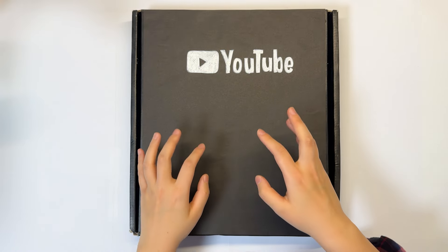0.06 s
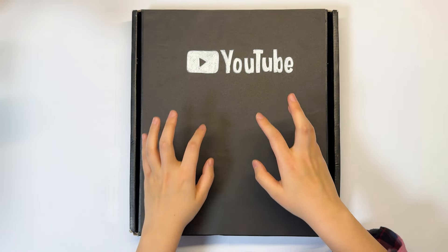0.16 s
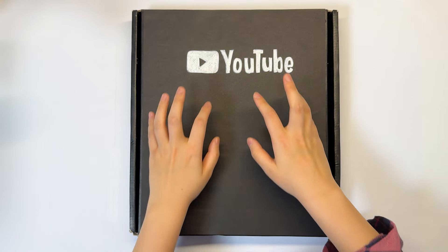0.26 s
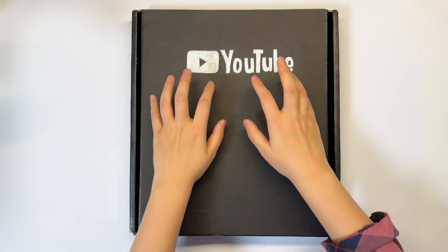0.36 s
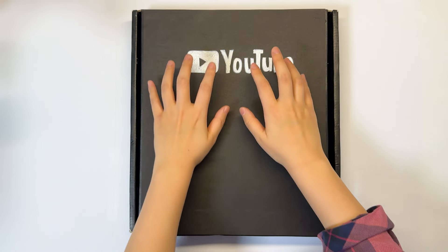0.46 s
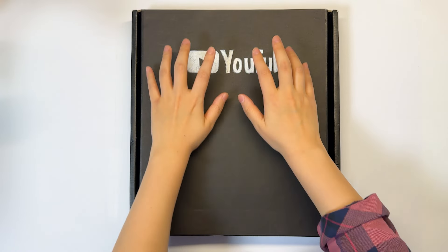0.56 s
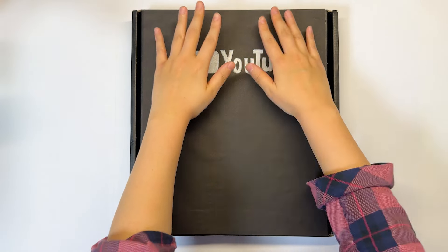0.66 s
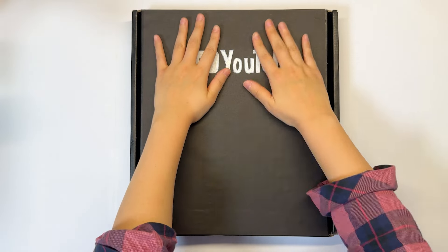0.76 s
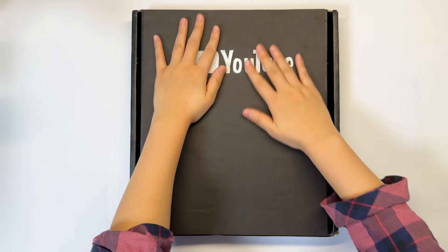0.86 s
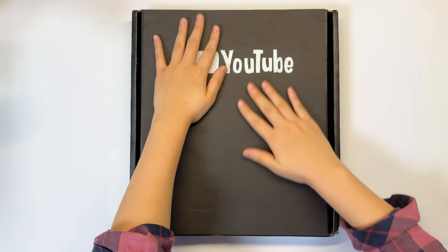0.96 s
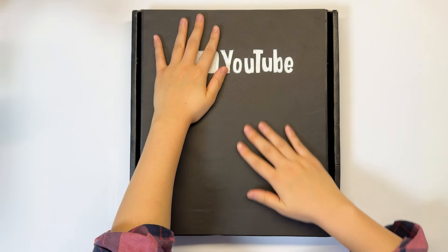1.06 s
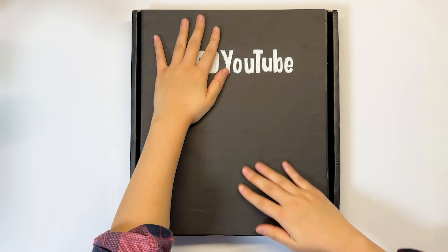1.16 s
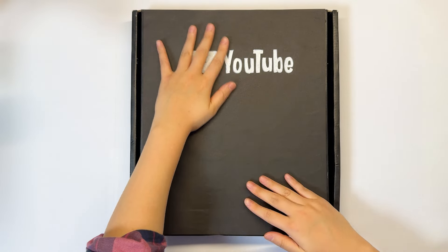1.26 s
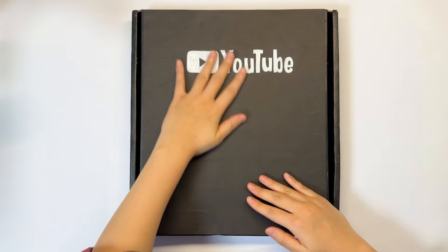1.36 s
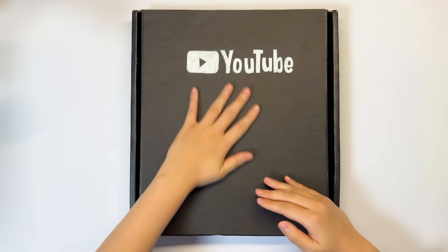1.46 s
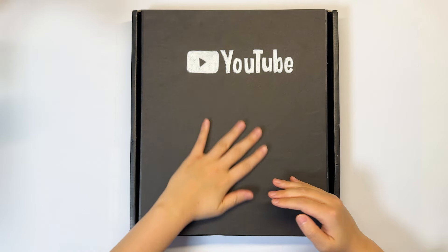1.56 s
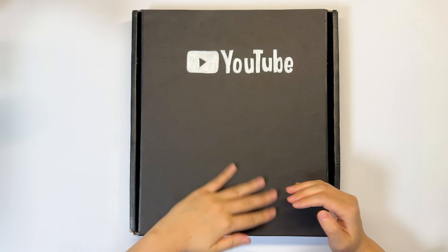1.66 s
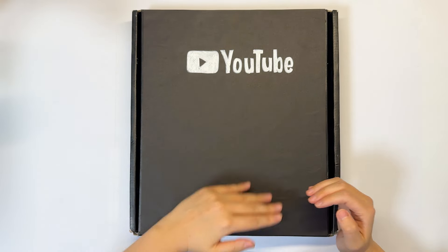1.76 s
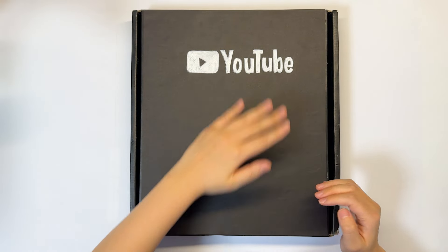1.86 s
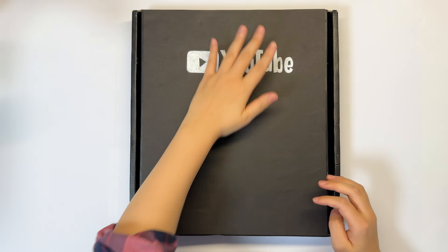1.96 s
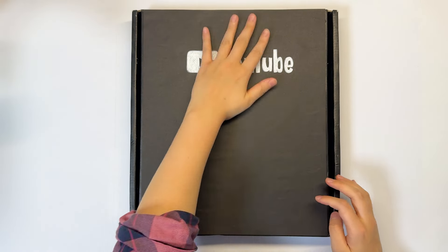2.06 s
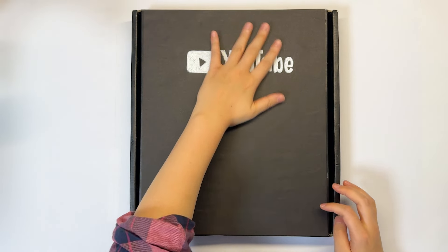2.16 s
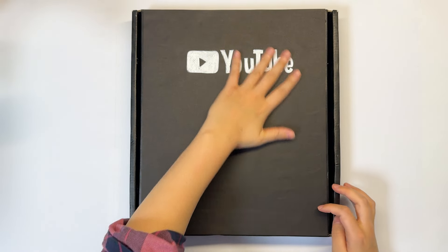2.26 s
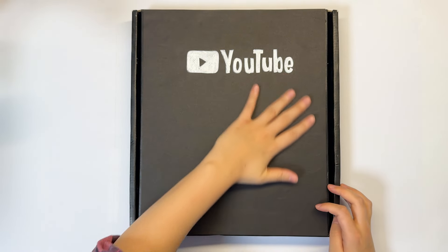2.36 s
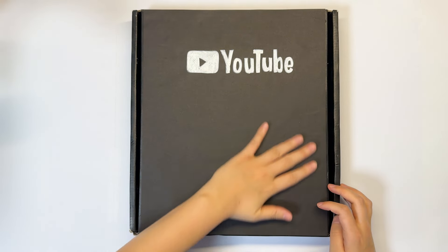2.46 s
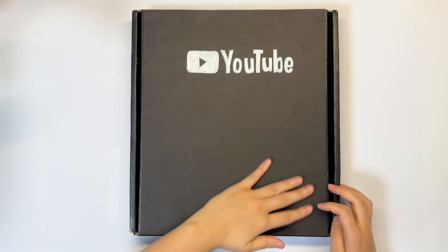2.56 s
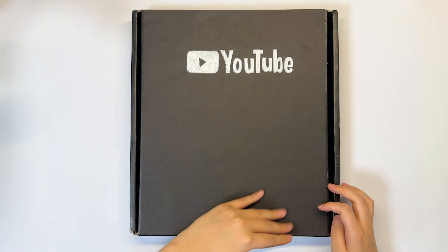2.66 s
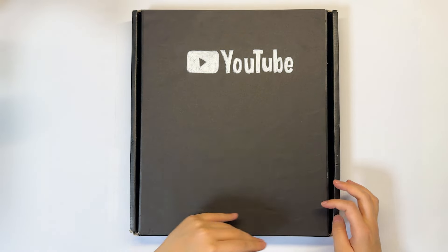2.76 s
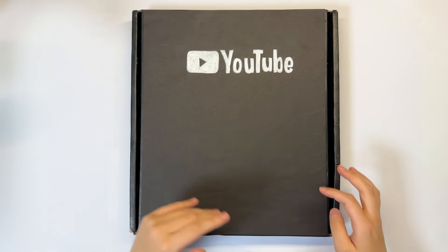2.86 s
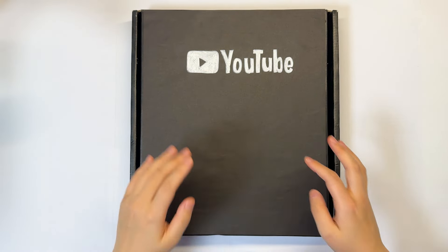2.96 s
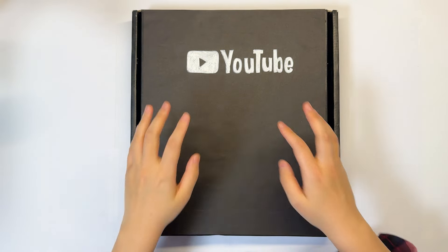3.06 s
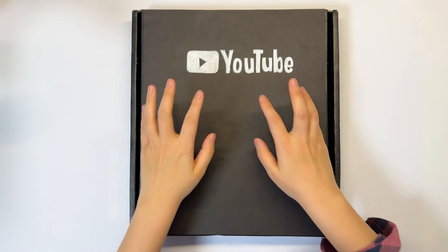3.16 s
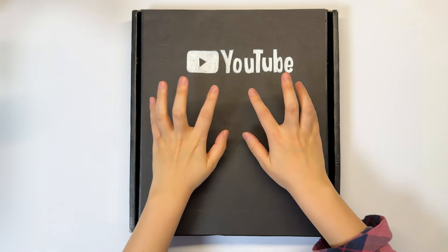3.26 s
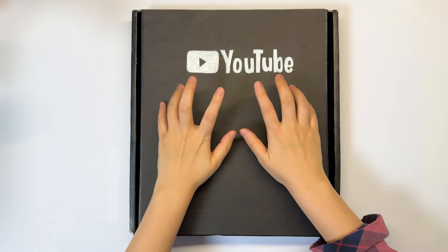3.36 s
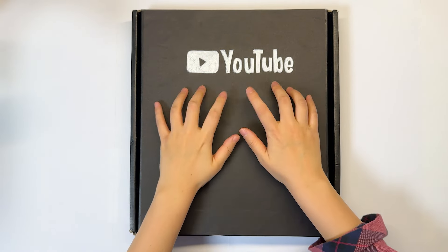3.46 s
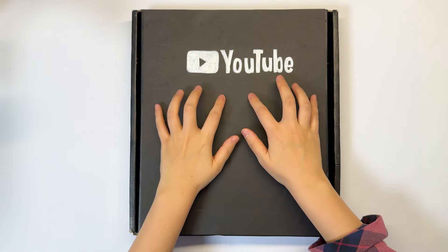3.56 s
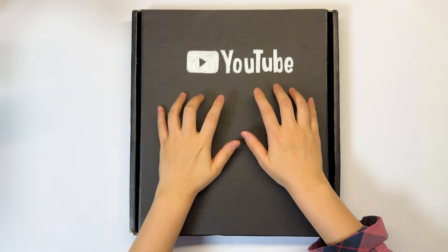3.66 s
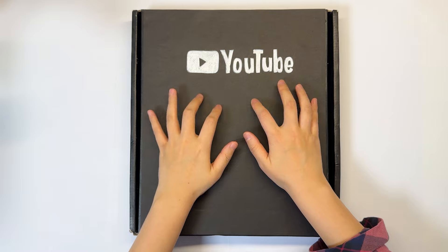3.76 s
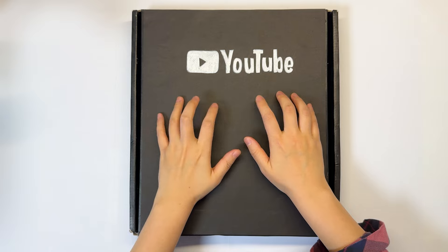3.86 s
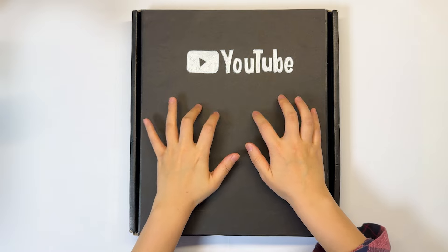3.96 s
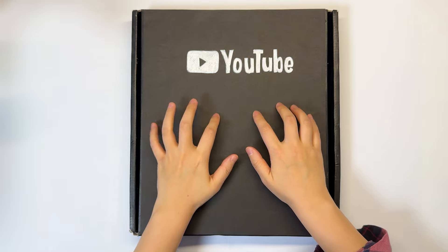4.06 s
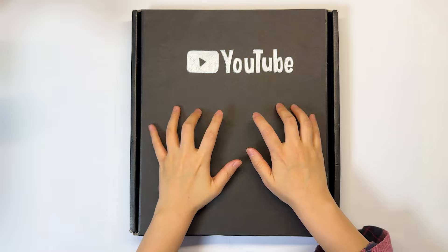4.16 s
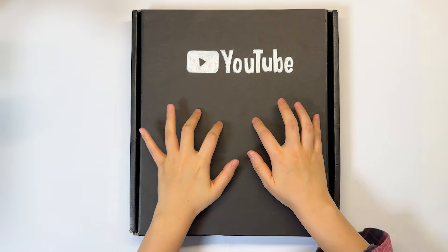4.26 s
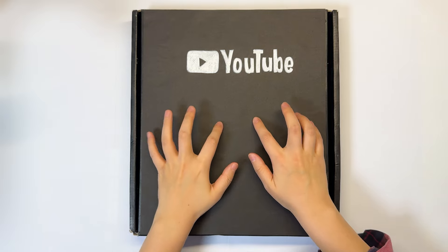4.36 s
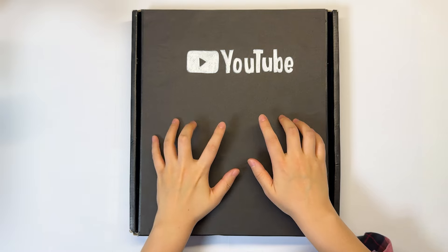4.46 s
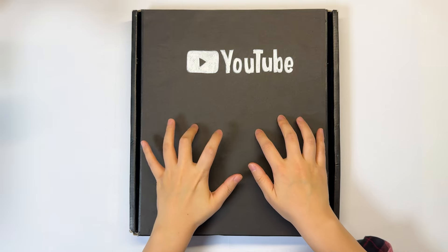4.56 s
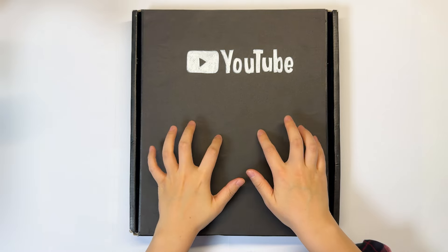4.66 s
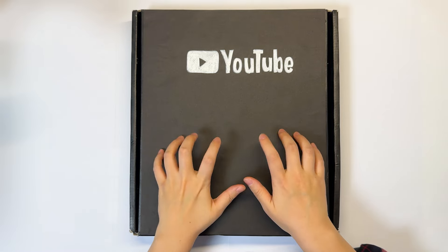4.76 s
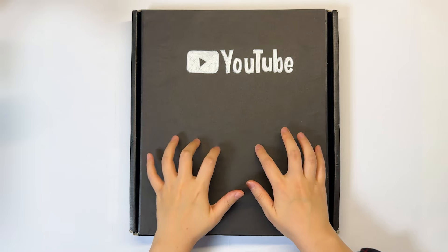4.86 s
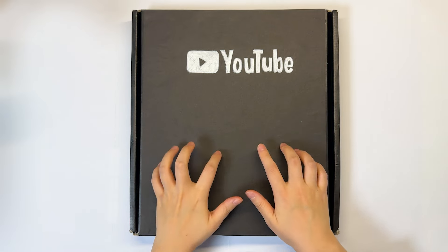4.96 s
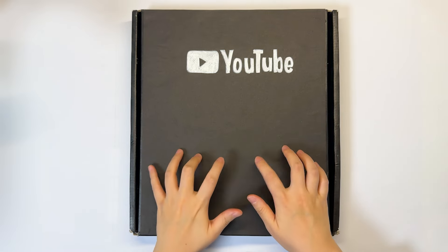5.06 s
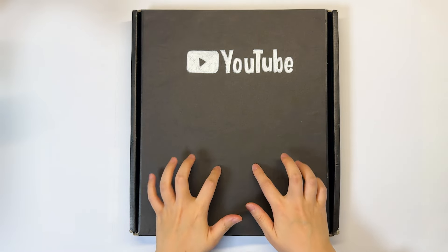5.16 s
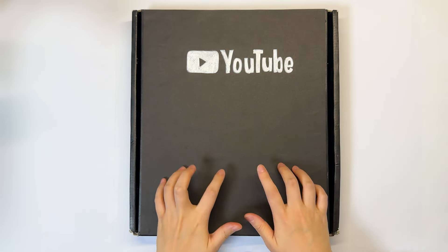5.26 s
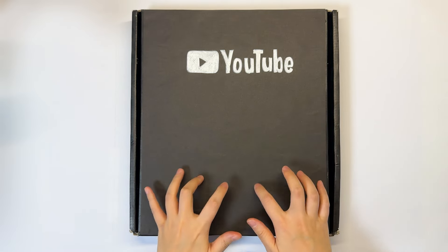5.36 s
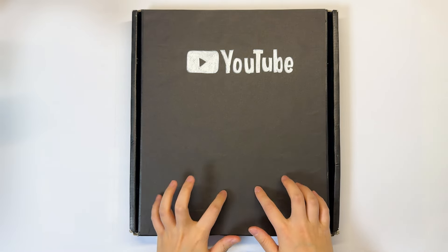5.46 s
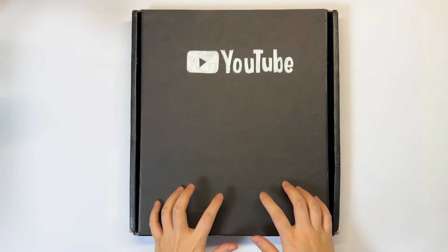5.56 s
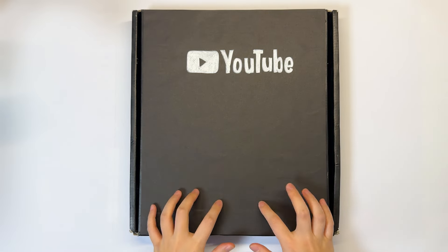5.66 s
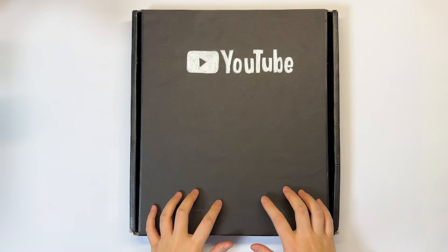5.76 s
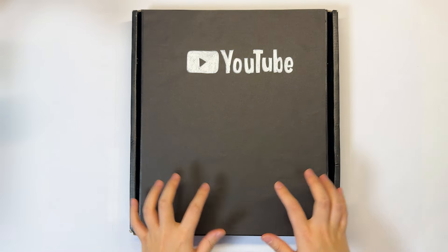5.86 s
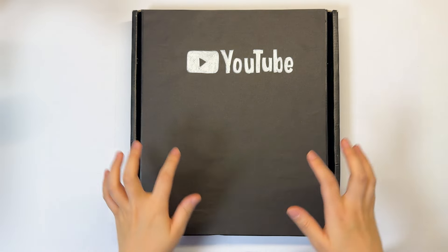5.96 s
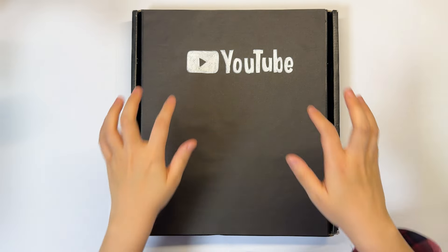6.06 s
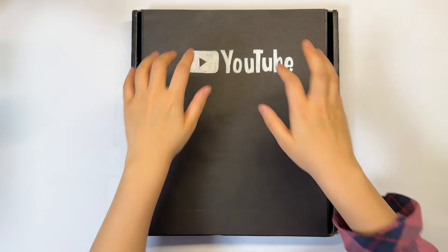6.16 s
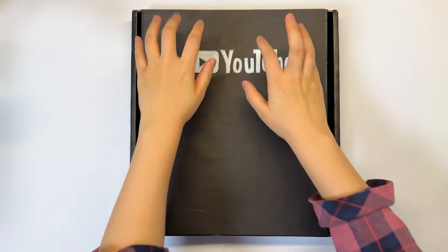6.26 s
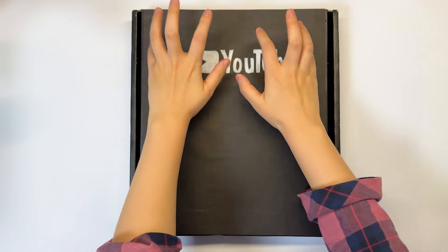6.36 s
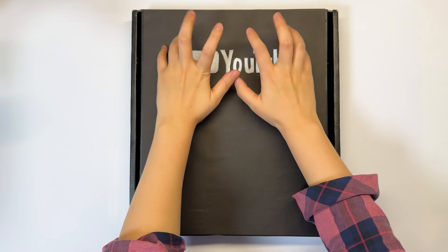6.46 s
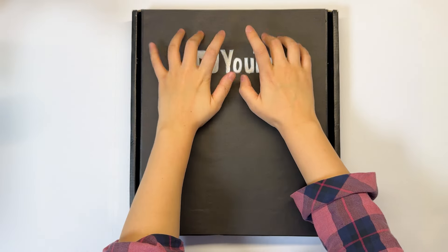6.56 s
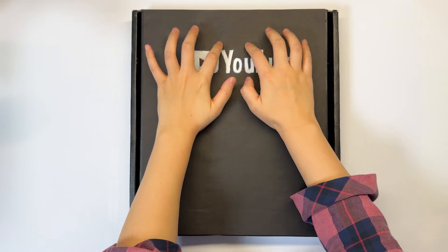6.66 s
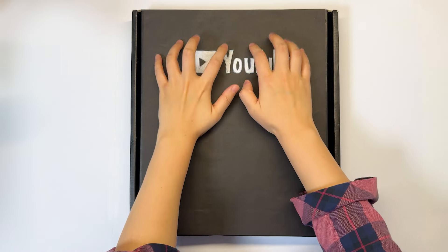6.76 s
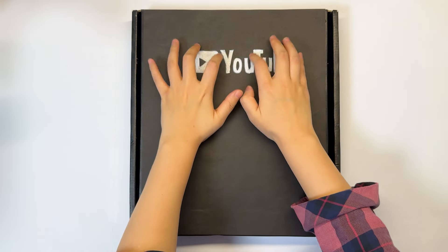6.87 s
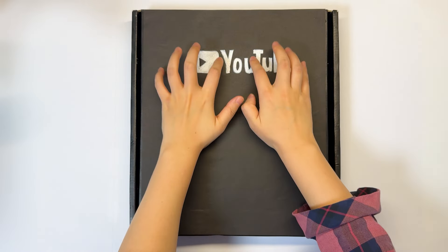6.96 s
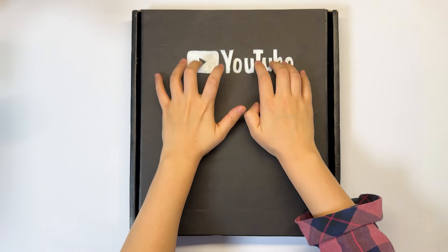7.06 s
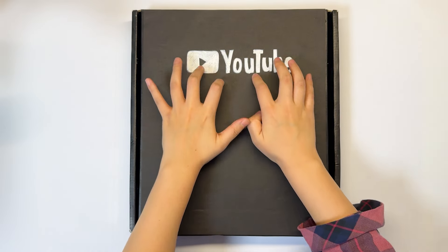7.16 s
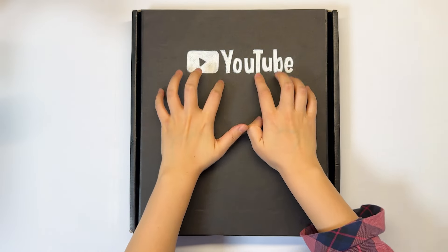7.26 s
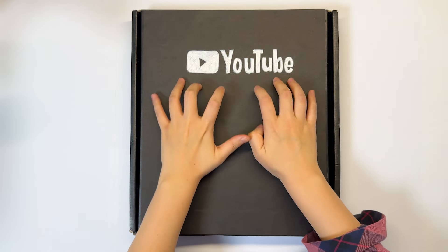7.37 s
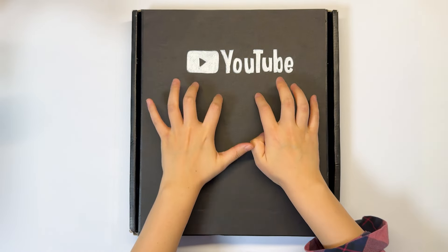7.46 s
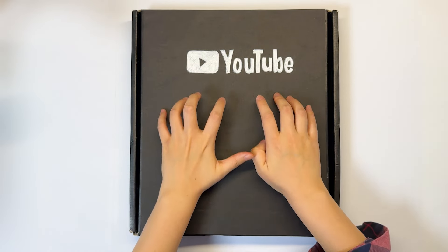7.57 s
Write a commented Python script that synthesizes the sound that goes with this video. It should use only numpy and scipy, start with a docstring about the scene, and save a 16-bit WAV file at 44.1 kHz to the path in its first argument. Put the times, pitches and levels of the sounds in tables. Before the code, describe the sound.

Soft dry skin strokes across a closed cardboard box, followed by dense irregular fingertip drumming, low and boxy, in a quiet small room.

```python
"""In a small, quiet room, two hands stroke the lid of a closed cardboard box, then drum on it in two bursts.
Tapping: a nail's noise burst ticks and knocks, then the finger pad's push rings lid and box modes as a thump.
Rubbing: hands, fingertips and sleeves are filtered noise whose level follows the speed of the movement.
Short echoes, a diffuse room response and a low room murmur surround the box, heard in close stereo."""
import sys
import numpy as np
from scipy import signal
from scipy.fft import rfft, irfft, next_fast_len
from scipy.io import wavfile
from scipy.ndimage import uniform_filter1d, map_coordinates

SR = 44100
rng = np.random.default_rng(int(sys.argv[2]) if len(sys.argv) > 2 else 0)


def bounce(signal):
    """Save signal as a 16-bit WAV file at the path given by the first command-line argument."""
    frames = np.transpose(np.atleast_2d(signal))
    limited = np.clip(frames, -1, 1)
    pcm = np.round(limited * 32767).astype(np.int16)
    wavfile.write(sys.argv[1], SR, pcm)


N = 335601


# bending modes of the lid: (frequency [Hz], level [dB], decay time t60 [s]); the struck spot scales the frequency
LID = [(236, 4, 0.085), (185, -15.5, 0.44), (282, -4, 0.057), (320.2, -5.5, 0.092), (349, -15.5, 0.23),
       (440, -19, 0.053)]
# modes of the box walls and the air inside: (frequency [Hz], level [dB], decay time t60 [s]);
# these keep their frequency wherever the finger strikes
BOX = [(66.8, -30, 0.27), (88, -26, 0.23), (125.2, -21, 0.66), (145.6, -3, 0.42), (186.6, -23, 0.41),
       (238.5, -21.5, .25), (301, -27.5, 0.16)]
PAD_LAG_S = 0.0022  # from nail to pad
FINGER_PAN_DB = 2  # spread of the left-right level difference between fingers
# finger taps: (time [s], thump level [dB], lid pitch at the spot [Hz], pad contact [ms], nail tick level [dB])
TAPS = [(0.740, -31.5, 247, 2.4, -49), (0.767, -16.5, 291, 1.65, -39.5), (1.262, -31, 260, 0.8, -66),
        (2.086, -36, 275, 2.25, -62), (2.103, -31.5, 312, 1.7, -53), (3.416, -20, 233, 2.7, -57),
        (3.434, -23, 250, 4.2, -43), (3.446, -7, 230, 2.26, -44), (3.519, -7.5, 225, 2.83, -55),
        (3.534, -11, 205.5, 2.5, -46.5), (3.664, -19, 240, 3.8, -52.5), (3.714, -13, 234, 4.6, -45.5),
        (3.778, -8, 226.5, 1.9, -46.5), (3.895, -24.5, 239, 3, -54), (3.945, -6, 232.5, 3.27, -43.5),
        (4.008, -13.5, 231, 3.65, -51), (4.013, -8.5, 227, 3.2, -48.5), (4.097, -20.5, 219, 3.7, -45.5),
        (4.118, -27, 243, 3.6, -47.5), (4.141, -23, 233, 3, -52), (4.193, -10.5, 234, 4.2, -47),
        (4.249, -16.5, 232, 3.1, -54.5), (4.306, -9.5, 226, 3.37, -43.5), (4.424, -30.5, 247, 2, -56.5),
        (4.458, -22.5, 235, 1.8, -49), (4.518, -9, 235, 3.5, -41.5), (4.597, -10, 221, 3.4, -50),
        (4.636, -3, 233, 2.3, -37), (4.747, -22, 226, 2.1, -46.5), (4.773, -17.5, 233, 3.6, -61),
        (4.833, -6, 237, 3.4, -46), (4.874, -12, 221, 3, -42), (4.917, -1.5, 236, 2.3, -49.5),
        (5.004, -21, 216, 1.3, -58), (5.032, -21, 236, 4.1, -61), (5.076, -7.5, 242, 3.2, -41),
        (5.131, -26, 224, 2.2, -45.5), (5.173, -11.5, 235, 2.4, -45.5), (5.239, -36, 202, 1.2, -57.5),
        (5.268, -28.5, 208, 1.1, -60), (5.304, -19, 230, 2.2, -53.5), (5.365, -12.5, 238, 2.34, -52.5),
        (5.448, -19.5, 225, 2.3, -55), (5.633, -14.5, 232, 1.56, -47), (5.695, -27.5, 217, 3.8, -51),
        (5.739, -22.5, 325, 3, -58), (6.500, -42, 354, 2.6, -54.5), (6.562, -5.5, 310, 1.08, -36),
        (6.573, -7, 308, 1.44, -43.5), (6.638, -10.5, 225, 0.51, -35), (6.689, -15, 214, 0.47, -38),
        (6.759, -25, 230, 1.1, -46), (6.782, -18.5, 343, 2.7, -36.5), (6.823, -22.5, 310, 3.6, -50),
        (6.838, -18.5, 212, 2.6, -39.5), (6.908, -20, 233, 0.66, -43.5), (6.919, -8.5, 230, 1.7, -46),
        (7.051, -19, 214, 0.75, -42.5), (7.070, -21.5, 300, 1.1, -55), (7.119, -5.5, 242, 1.3, -45.5),
        (7.168, -20.5, 218, 3.2, -47.5), (7.202, -1.5, 243, 1.85, -47.5), (7.330, -19, 202, 0.67, -40),
        (7.341, -17.5, 213, 2.5, -39.5), (7.397, -13.5, 238, 4.5, -47), (7.430, -14.5, 213, 3.1, -55),
        (7.477, -4, 232, 2.5, -56), (7.557, -19, 238, 4.6, -56), (7.565, -17, 221, 3, -48),
        (7.592, -14, 240, 3.9, -45.5)]


def finger_pads(taps):
    """Modal excitation: each pad rings the lid, higher near its stiff edges, and the box below it."""
    out = np.zeros((2, N))
    for s, db, hz, contact_ms, _ in taps:
        lid = response(LID, shift=hz / LID[0][0], scatter_db=-3.5)
        body = lid + response(BOX, scatter_db=-2.5)
        pan_db = FINGER_PAN_DB * rng.standard_normal()
        pan = undb(pan_db * np.array([[1], [-1]]) / 2)
        add(out, s + PAD_LAG_S, pan * thump(body, db, contact_ms))
    return out


# modes of the whole box on the table: (frequency [Hz], level [dB], decay time t60 [s])
ROCKING = [(84.5, -3, 0.054), (123.4, 0.5, 0.24), (150.6, -2.5, 0.4)]
# a hand's weight settling: (time [s], thump level [dB], contact [ms])
LANDINGS = [(0.778, -23, 1.37), (2.114, -33, 3.2), (6.572, -17.5, 2.8), (6.64, -19, 2.1)]


def landings():
    """Rigid-body motion: a hand's settling weight rocks the whole box."""
    out = np.zeros((2, N))
    for s, db, contact_ms in LANDINGS:
        add(out, s, thump(response(ROCKING), db, contact_ms))
    return out


def thumps(taps):
    """Radiation and damping: a small box hardly radiates deep bass, and soft flesh smothers higher modes."""
    lowest_hz, flesh_hz = 64, 540
    band = signal.butter(3, [lowest_hz, flesh_hz], "band", fs=SR, output="sos")
    return signal.sosfiltfilt(band, finger_pads(taps) + landings(), padtype="even")


LID_SPREAD = 0.645  # phase lag of bending waves [radians per root Hz]


def response(modes, shift=1, scatter_db=0, size=16384):
    """Modal superposition and dispersion: modes add up, and bending waves bring the highs first."""
    f = np.arange(size // 2 + 1) * SR / size
    s = 2j * np.pi * f
    hz, db, t60 = np.transpose(modes)[:, :, None]
    # each call scatters the mode levels; the strongest keeps its own
    scatter = scatter_db * rng.standard_normal(db.shape) * (db < db.max())
    gain = undb(db + scatter)
    damping = 2 * np.log(1000) / t60
    rings = gain * damping * s / (s * s + damping * s + (2 * np.pi * hz * shift) ** 2)
    return rings.sum(0) * np.exp(-1j * LID_SPREAD * np.sqrt(f))


def thump(body, db, contact_ms):
    """Contact time sets bandwidth: a longer soft push gives a duller ring."""
    ms = np.arange(2 * (len(body) - 1)) * 1000 / SR
    shortest_ms = .5
    push = np.sin(np.pi * np.minimum(ms / max(contact_ms, shortest_ms), 1)) ** 2
    ring = irfft(rfft(push) * body)
    return ring * undb(db) / abs(ring).max()


# the knock grows with the blow and the pitch of the spot, and weakens as the contact gets softer
KNOCK_DB, KNOCK_DB_PER_DB, KNOCK_DB_PER_OCTAVE, KNOCK_DB_PER_MS = -32.5, 0.6566, 5.5, -1.69
# spectrum of the nail on the coating: (frequency [Hz], relative level [dB per Hz])
TICK = [(2000, -16), (4000, -21.5), (5500, -25.5), (7000, -16), (8600, -9.5), (11600, -1), (13000, -6.5),
        (14800, -8), (16500, -15)]
# spectrum of the board's knock: (frequency [Hz], relative level [dB per Hz])
KNOCK = [(350, -20.5), (620, 5), (950, 3), (1250, -4), (1600, -9), (2300, -19.5), (3000, -21.5),
         (3800, -20.5), (6500, -31.5)]


def nails(taps):
    """Impact noise: each nail ticks on the coating, and the stiff board knocks just after."""
    ticks, knocks = np.zeros((2, 2, N))
    spread_db = 2.8
    for s, db, hz, contact_ms, tick_db in taps:
        octaves = np.log2(hz / LID[0][0])
        knock_db = KNOCK_DB + KNOCK_DB_PER_DB * db
        knock_db += KNOCK_DB_PER_OCTAVE * octaves + KNOCK_DB_PER_MS * contact_ms
        tick = burst(rise_s=0.00058, fall_s=0.00071, tail_db=-28.5, tail_s=0.012, width=0.024)
        knock = burst(rise_s=0.00074, fall_s=0.0024, tail_db=-13, tail_s=0.015, width=0.45)
        add(ticks, s, undb(tick_db) * spot(tick, spread_db))
        add(knocks, s + .0006, undb(knock_db) * spot(knock, spread_db))
    return undb(3.0) * colour(ticks, TICK) + undb(2.0) * colour(knocks, KNOCK)


def burst(rise_s, fall_s, tail_db, tail_s, width, size=3000):
    """Two-stage decay: crushed paper grain gives a quick rough onset, then a faint rattle in the board."""
    t = np.arange(size) / SR
    onset = (1 - np.exp(-t / rise_s)) ** 2
    decay = np.exp(-t / fall_s) + undb(tail_db) * np.exp(-t / tail_s)
    shape = onset * decay
    return pair(width, size) * shape / np.sqrt(np.mean(shape[:size // 10] ** 2))


def spot(sound, spread_db, count=26):
    """Local resonance: every spot on the board favours its own few bands."""
    hz = np.geomspace(450, 7000, count)
    db = spread_db * rng.standard_normal(count)
    db[[0, -1]] = 0
    return colour(sound, np.column_stack([hz, db]))


# bouts of drumming, with the fingertips dragging between taps:
# (start time [s], speeding up [s], steady [s], slowing down [s], relative hiss level [dB], relative rasp level [dB])
BOUTS = [(3.3, 1.3, 1.02, 0.24, -68.5, -67), (6.419, 0.18, 1.2, 0.3, -65.5, -64)]
# light touches of the other fingers: their rate, a typical one, and the spread of its two levels
TOUCHES_PER_S = 6
TOUCH_DB, TOUCH_HZ, TOUCH_CONTACT_MS, TOUCH_TICK_DB, TOUCH_SPREAD_DB = -30.5, 262, 1.55, -64.5, 5


def touches():
    """Jittered periodicity: light, loosely timed taps through each bout, as rows like the finger taps."""
    rows = []
    for start_s, rise_s, hold_s, *_ in BOUTS:
        for k, (late, force, nail) in enumerate(rng.standard_normal(size=(24, 3))):
            s = (k + 1 + np.tanh(late) / 2) / TOUCHES_PER_S
            if s < rise_s + hold_s:
                db = TOUCH_DB + TOUCH_SPREAD_DB * force
                tick_db = TOUCH_TICK_DB + TOUCH_SPREAD_DB * nail
                rows.append((start_s + s, db, TOUCH_HZ, TOUCH_CONTACT_MS, tick_db))
    return rows


# spectrum of the skin's hiss: (frequency [Hz], relative level [dB per Hz])
HISS = [(3000, -35.5), (6000, -22.5), (7200, -14.5), (8500, -9.5), (10000, -10.5), (11600, -1.5),
        (13000, -8), (15500, -8.5)]
# spectrum of the board's rasp: (frequency [Hz], relative level [dB per Hz])
RASP = [(50, -39.5), (130, -3.5), (330, 1.5), (650, -4.5), (920, -1.5), (1300, -4), (2300, -1.5),
        (3000, -4.5), (3800, -2.5), (5500, -7), (9000, -8)]
# hand strokes, trailing fingertips and short brushes:
# (start time [s], speeding up [s], steady [s], slowing down [s], relative hiss level [dB], relative rasp level [dB])
STROKES = [(0.715, 0.22, 0.027, 0.38, -42.5, -43.5), (1.195, 0.18, 0.22, 0.19, -41.5, -45.5),
           (1.815, 0.05, 0.002, 0.055, -65, -58), (2.06, 0.25, 0.19, 0.23, -42, -45),
           (2.56, 0.079, 0.07, 0.055, -57, -54), (5.56, 0.064, 0.003, 0.04, -58.5, -61),
           (5.795, 0.035, 0.0033, 0.029, -69.5, -68)]


def strokes():
    """Sliding friction: hands and fingertips slide over the lid, the skin hisses and the board rasps under it."""
    hiss, rasp = rubbing(STROKES)
    skin = undb(5.5) * hiss * friction(HISS, width=0.049, grain_db=1.0, waver_db=1.03)
    board = undb(2.0) * rasp * friction(RASP, width=0.42, grain_db=0.0, waver_db=1.5)
    return wander(skin, spread_db=1.3, rate=9.8) + wander(board, spread_db=2.0, rate=8.7)


# after landing, a fingertip skids and comes to rest; a constant drag remains, relative to the peak of a skid
SKID_RISE_S, SKID_FALL_S, RESTING_DB = 0.006, 0.024, -1.5


def drags(taps):
    """Intermittent friction: each fingertip skids after it lands, scraping the lid in fits and starts."""
    hiss, rasp = rubbing(BOUTS)
    t = np.arange(SR // 3) / SR
    skid = (1 - np.exp(-t / SKID_RISE_S)) * np.exp(-t / SKID_FALL_S)
    power = np.full(N, undb(RESTING_DB) ** 2)
    for s, *_ in taps:
        add(power, s, (skid / skid.max()) ** 2)
    pressure = np.sqrt(power) * undb(1.5 * walk(14))
    skin = hiss * friction(HISS, width=0.31, grain_db=6.0, waver_db=2)
    board = rasp * friction(RASP, width=0.77, grain_db=0.0, waver_db=4.0)
    return wander(pressure * (skin + board), spread_db=4.0, rate=11)


# friction level follows the hand's speed to these powers
HISS_POWER, RASP_POWER = 1.82, 1.55
RASP_LATER = 0.29  # rasp delay as the hand leans in: share of the time spent speeding up


def rubbing(moves):
    """Power law of friction noise: the speed of each move drives the levels of hiss and rasp."""
    hiss, rasp = np.zeros((2, N))
    for start_s, rise_s, hold_s, fall_s, hiss_db, rasp_db in moves:
        lean_s = min(RASP_LATER * rise_s, hold_s)
        skin_speed = glide(start_s, rise_s, hold_s, fall_s)
        board_speed = glide(start_s, rise_s + lean_s, hold_s - lean_s, fall_s)
        hiss = np.hypot(hiss, undb(hiss_db) * skin_speed ** HISS_POWER)
        rasp = np.hypot(rasp, undb(rasp_db) * board_speed ** RASP_POWER)
    return hiss, rasp


def glide(start_s, rise_s, hold_s, fall_s):
    """Kinematics: the speed of a hand, 0-1, eases in, holds and eases out."""
    t = np.arange(N) / SR - start_s
    rising = t / max(rise_s, 1 / SR)
    falling = (rise_s + hold_s + fall_s - t) / max(fall_s, 1 / SR)
    return np.sin(np.pi / 2 * np.clip(np.minimum(rising, falling), 0, 1))


def friction(spectrum, width, grain_db, waver_db):
    """Friction noise: countless tiny slips over a surface under a wavering pressure."""
    slips = undb(grain_db * walk(1500) + waver_db * walk(45))
    return colour(pair(width) * slips / np.sqrt(np.mean(slips ** 2)), spectrum)


def wander(x, spread_db, rate, count=24):
    """Time-varying filtering: as the spot under the hand changes, every band swells and sinks on its own."""
    hz, s, bands = signal.stft(x, SR, nperseg=1024)
    place = np.interp(np.log(hz + 1), np.log([500, 16000]), [0, count - 1])
    levels = rng.standard_normal((int(s[-1] * rate) + 2, count)).T
    grid = np.meshgrid(place, s * rate, indexing="ij")
    db = spread_db * map_coordinates(levels, grid, order=1, mode="nearest")
    return signal.istft(bands * undb(db), SR)[1][:, :N]


# spectrum of shirt cloth: (frequency [Hz], relative level [dB per Hz])
CLOTH = [(300, 7), (1500, 3.5), (2200, 0), (3500, -10), (6000, -13), (8000, -4.5), (11600, -3.5),
         (15000, -17)]
# arms reaching forward: (start time [s], speeding up [s], steady [s], slowing down [s], level [dB])
SLEEVES = [(0.06, 0.42, 0.17, 0.067, -64), (6.1, 0.16, 0.017, 0.15, -73)]


def sleeves():
    """Cloth friction: shirt sleeves hiss faintly as the arms reach over the box."""
    level = sum(undb(db) * glide(*timing) for *timing, db in SLEEVES)
    return level * friction(CLOTH, width=0.46, grain_db=2.0, waver_db=2.7)


# reflections from the table and things on it: (delay [ms], gain [ratio])
NEAR_ECHOES = [(3.1, 0.033), (9.5, 0.094)]


def near_echoes(x):
    """Early reflection: delayed copies reach each port at a slightly different time."""
    out = x.copy()
    for ms, gain in NEAR_ECHOES:
        for side in range(2):
            add(out[side], ms / 1000 * rng.uniform(.97, 1.03), gain * x[side])
    return out


# how strongly the room answers: (frequency [Hz], relative level [dB])
ROOM_COLOUR = [(60, 32), (200, 1.5), (350, -4), (600, 6), (1500, 2), (5000, -3), (9000, -19), (15000, -34)]


def room(x, wet_db, t60_s, first_s, size=22050):
    """Diffuse reverberation: table and near walls answer, less alike left and right in the treble."""
    t = np.arange(size) / SR
    # silent until first_s, full at twice that
    decay = np.exp(-np.log(1000) * t / t60_s) * np.clip(t / first_s - 1, 0, 1)
    mid, side = rng.standard_normal((2, size)) * decay
    side = signal.sosfilt(signal.butter(1, 700, "high", fs=SR, output="sos"), side)
    echoes = np.array([mid + side, mid - side]) / np.sqrt(2 * np.sum(mid ** 2))
    return undb(wet_db) * signal.fftconvolve(x, colour(echoes, ROOM_COLOUR), axes=1)[:, :N]


ROOM_TONE_DB = -57.5
# spectrum of the room's murmur: (frequency [Hz], relative level [dB])
ROOM_TONE = [(20, -22), (40, -5), (70, 0), (125, -5), (280, -10), (420, -17), (1000, -27), (2000, -38),
             (4000, -44), (8000, -43), (12000, -44), (16000, -56)]


def room_tone():
    """Stationary noise: the low, steady murmur of the room's air."""
    return undb(ROOM_TONE_DB) * colour(pair(width=0.32), ROOM_TONE)


def undb(db):
    """Level law: decibels to amplitude gain."""
    return 10 ** (np.asarray(db) / 20)


def colour(x, points):
    """Minimum-phase filtering: a causal filter with a (Hz, dB) spectrum; white noise keeps its power."""
    size = 2 * next_fast_len(x.shape[-1] // 2 + 2048)
    hz, db = np.transpose(points)
    f = np.arange(size // 2 + 1) * SR / size
    gain = undb(np.interp(np.log(f + 1), np.log(hz), db))
    # folding the cepstrum onto positive times makes the filter causal
    cepstrum = irfft(np.log(gain / np.sqrt(np.mean(gain ** 2))))
    cepstrum[1:size // 2] *= 2
    cepstrum[size // 2 + 1:] = 0
    return irfft(rfft(x, size) * np.exp(rfft(cepstrum)))[..., :x.shape[-1]]


def pair(width, size=N):
    """Stereo coherence: left and right noise; width 0 is alike, 1 unrelated."""
    mid, side = rng.standard_normal((2, size))
    return np.array([mid + width * side, mid - width * side]) / np.sqrt(1 + width ** 2)


def walk(rate):
    """Random modulation: levels held 1 / rate s and slewed; spread near 1."""
    hold = max(int(SR / rate), 1)
    steps = np.repeat(rng.standard_normal(N // hold + 1), hold)
    return uniform_filter1d(steps, hold)[:N] * np.sqrt(3 / 2)


def add(out, s, sound):
    """Superposition: mix a sound in at time s."""
    start = int(round(s * SR))
    out[..., start:start + sound.shape[-1]] += sound[..., :max(N - start, 0)]


def scene():
    """Level panning: the tapping lies a little to the right of the microphone."""
    right_db = 1.1
    pan = undb(np.array([[-right_db], [right_db]]) / 2)
    taps = TAPS + touches()
    sliding = strokes() + drags(taps) + sleeves()
    box = pan * thumps(taps) + near_echoes(pan * nails(taps) + sliding)
    return box + room(box, wet_db=-8, t60_s=0.42, first_s=0.0052) + room_tone()


TOP_HZ = 15900
# the two microphone ports drift apart in the treble: (frequency [Hz], phase by which the left leads [radians])
PORT_PHASE = [(2100, 0), (3200, -1.1), (4400, -.3), (5400, -1.2), (6200, -.2), (7000, 0), (8000, .6),
              (9700, 3.14), (12200, 6.28), (14750, 9.42), (15600, 10.3)]


def record(dry):
    """Interchannel phase and band limits: the ports differ in treble phase; deepest bass and top are cut."""
    lead = np.interp(np.arange(N + 1) * SR / (2 * N), *np.transpose(PORT_PHASE))
    turn = np.exp(.5j * np.array([lead, -lead]))
    ports = irfft(rfft(dry, 2 * N) * turn)[:, :N]
    ports = signal.sosfiltfilt(signal.butter(3, 36, "high", fs=SR, output="sos"), ports, padtype="even")
    return signal.sosfilt(signal.ellip(10, .2, 70, TOP_HZ, fs=SR, output="sos"), ports)


dry = scene()
out = record(dry)
bounce(out)
```